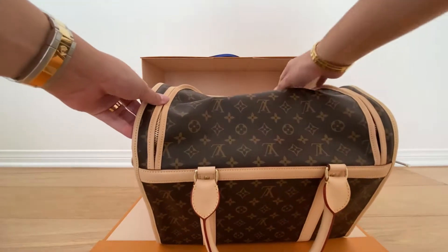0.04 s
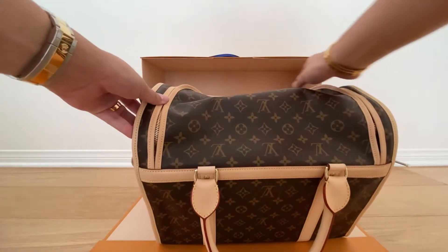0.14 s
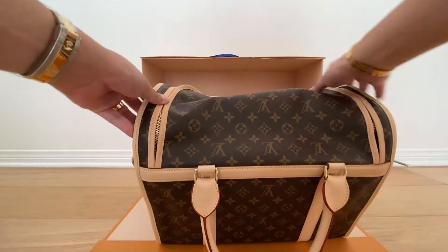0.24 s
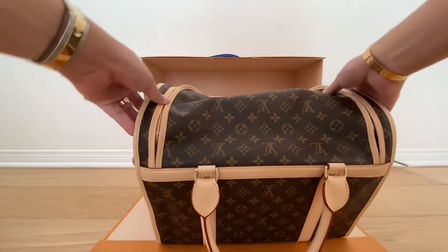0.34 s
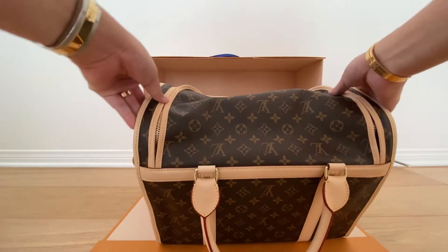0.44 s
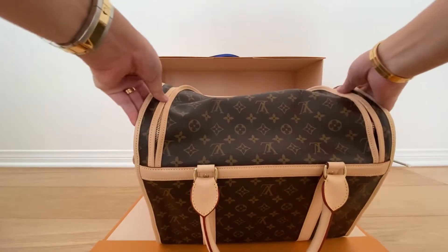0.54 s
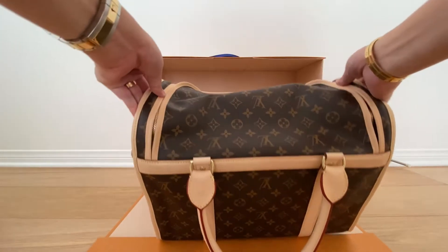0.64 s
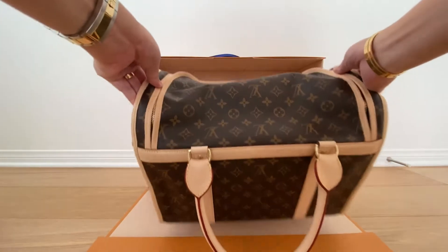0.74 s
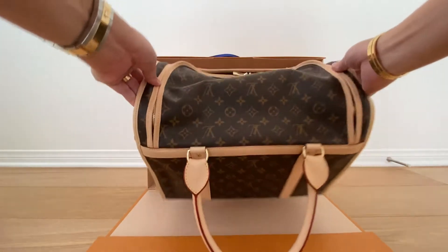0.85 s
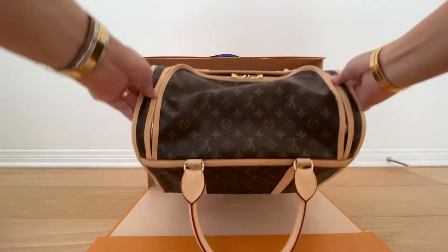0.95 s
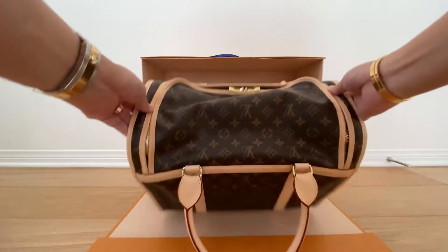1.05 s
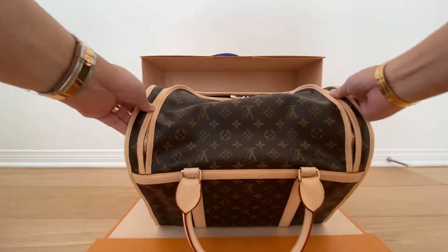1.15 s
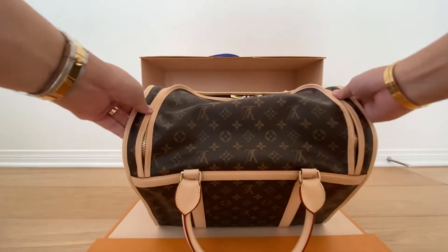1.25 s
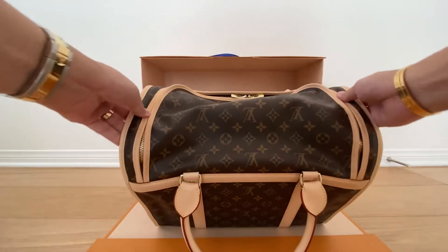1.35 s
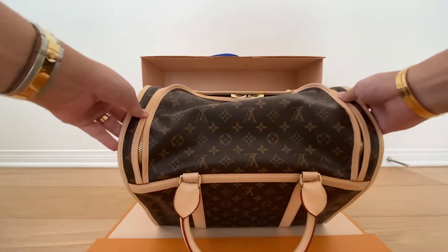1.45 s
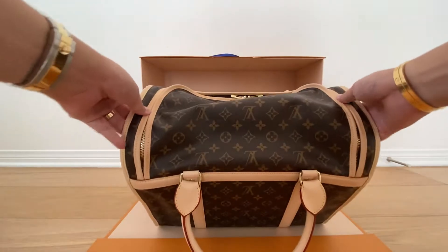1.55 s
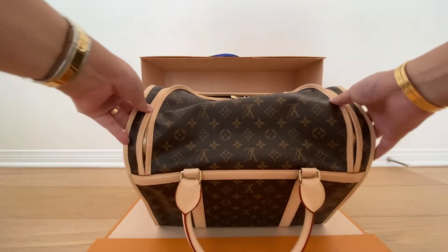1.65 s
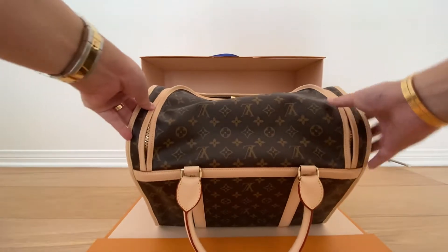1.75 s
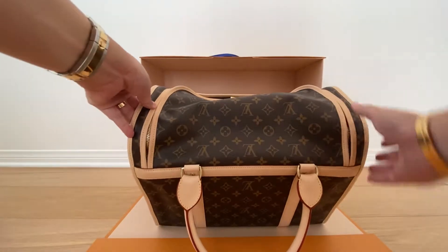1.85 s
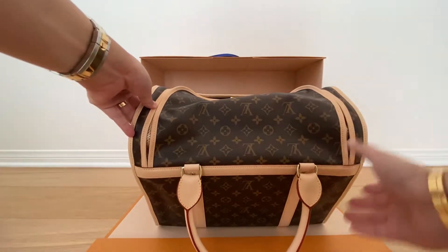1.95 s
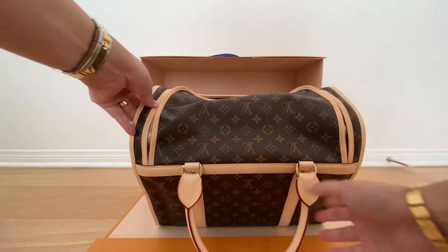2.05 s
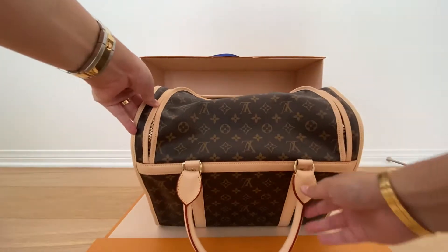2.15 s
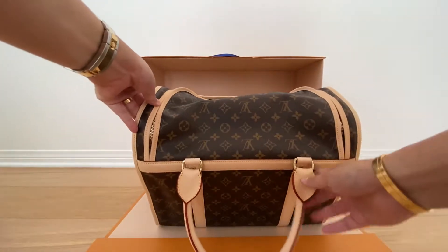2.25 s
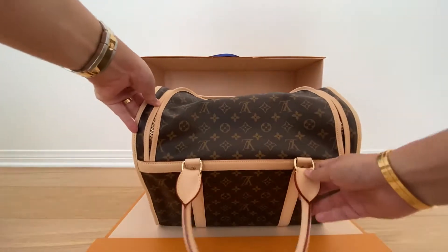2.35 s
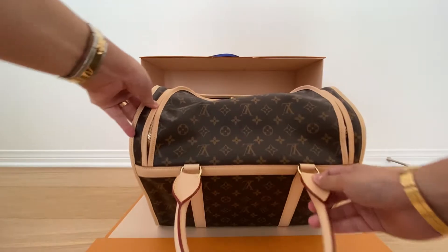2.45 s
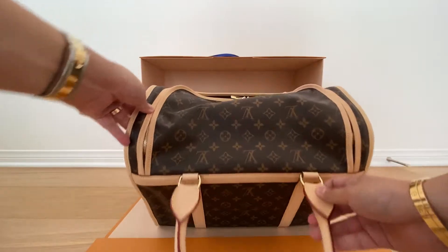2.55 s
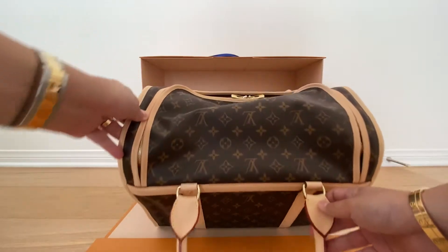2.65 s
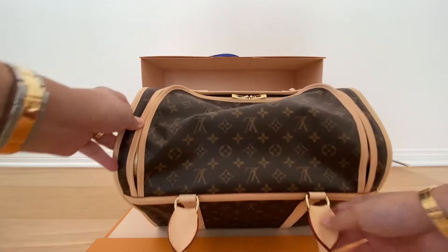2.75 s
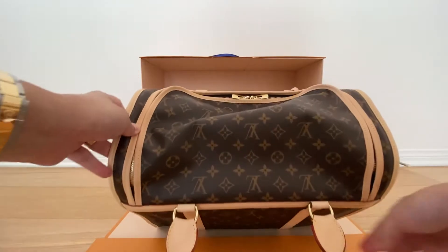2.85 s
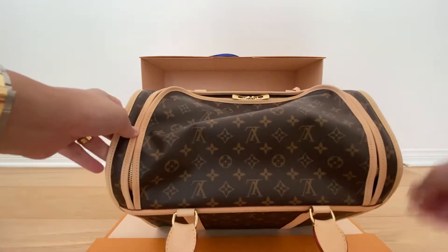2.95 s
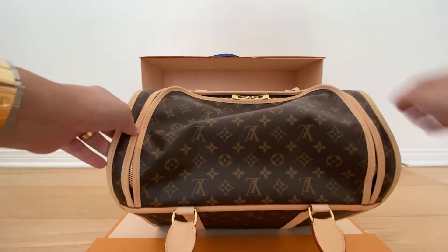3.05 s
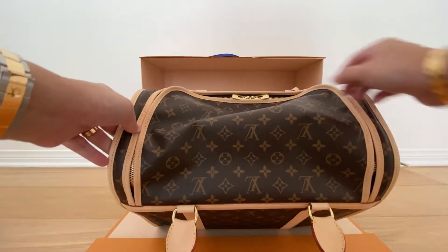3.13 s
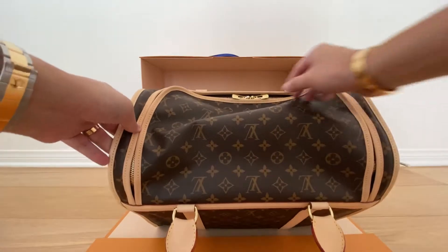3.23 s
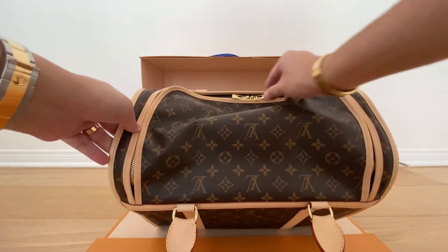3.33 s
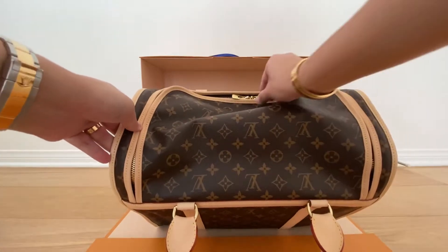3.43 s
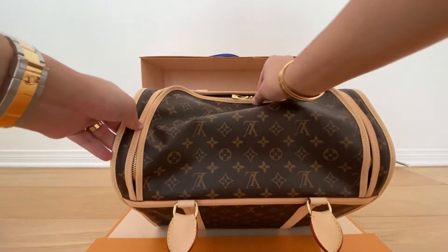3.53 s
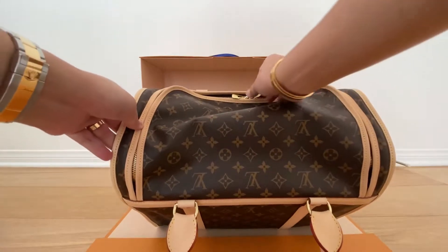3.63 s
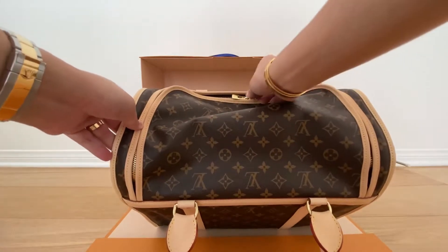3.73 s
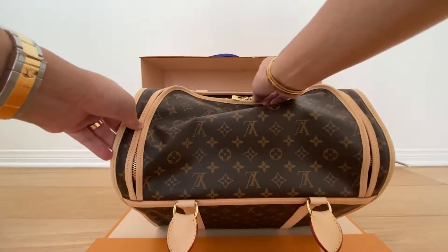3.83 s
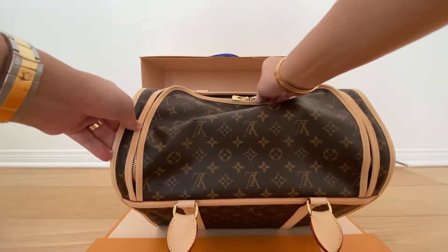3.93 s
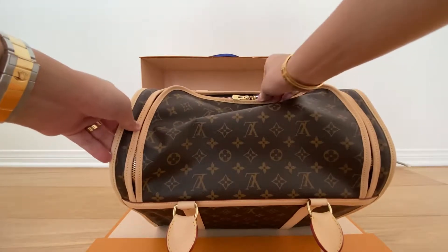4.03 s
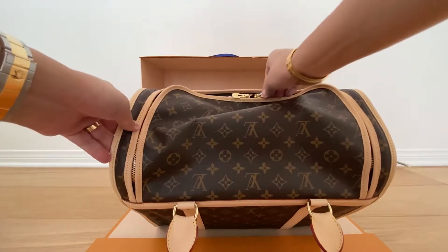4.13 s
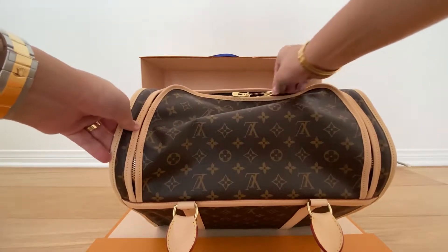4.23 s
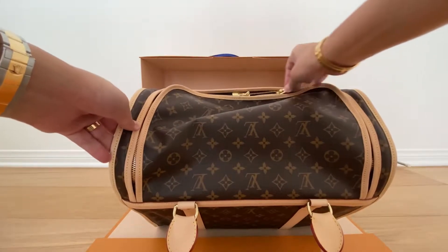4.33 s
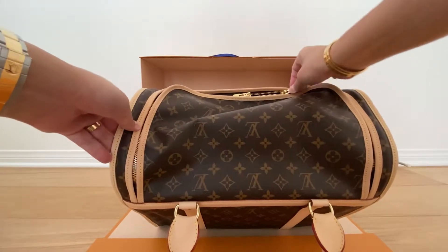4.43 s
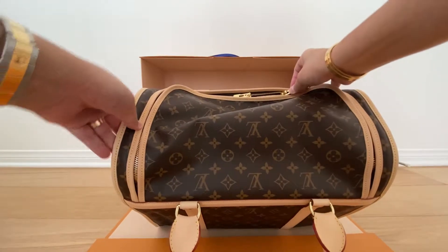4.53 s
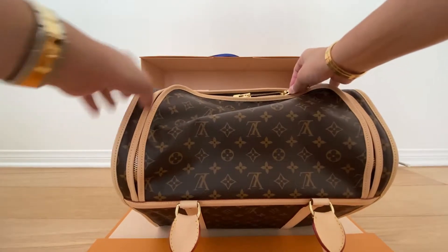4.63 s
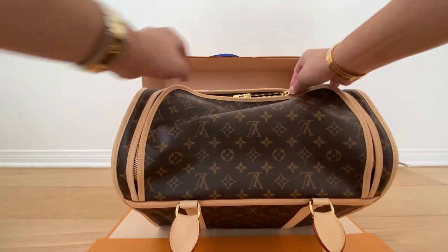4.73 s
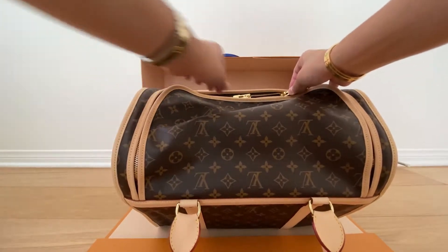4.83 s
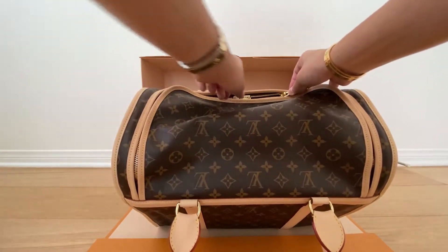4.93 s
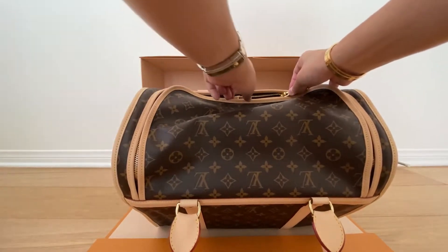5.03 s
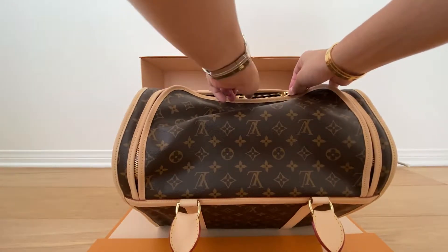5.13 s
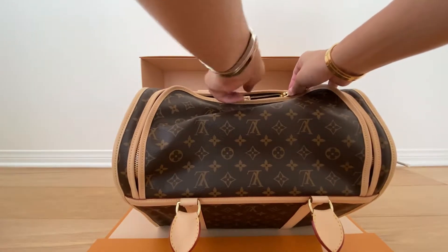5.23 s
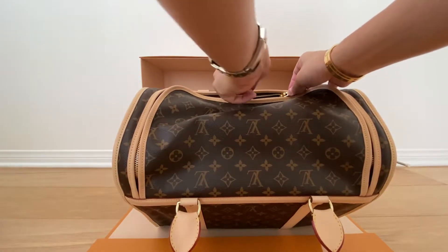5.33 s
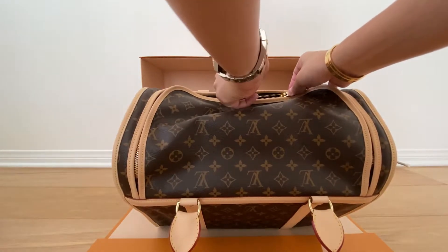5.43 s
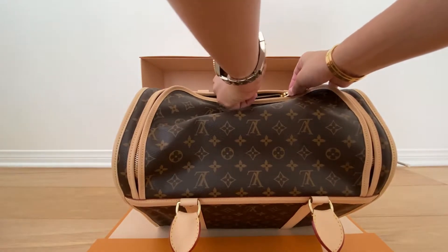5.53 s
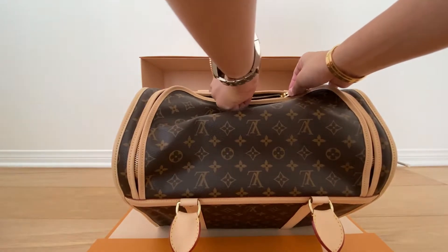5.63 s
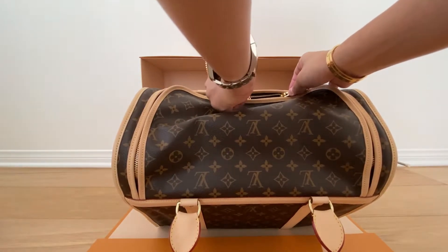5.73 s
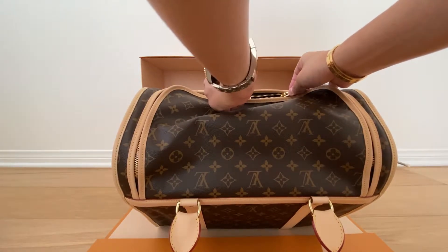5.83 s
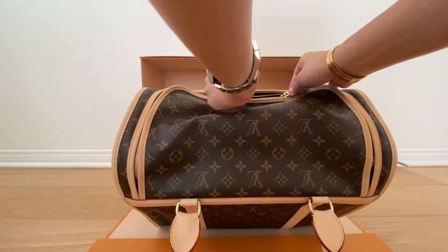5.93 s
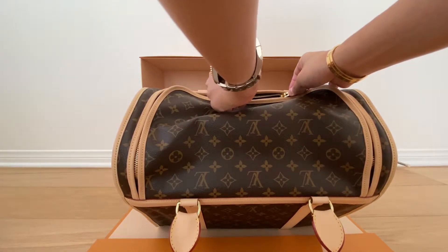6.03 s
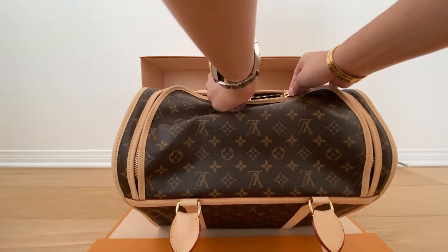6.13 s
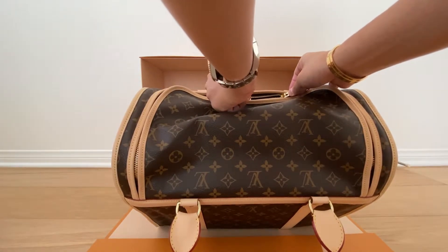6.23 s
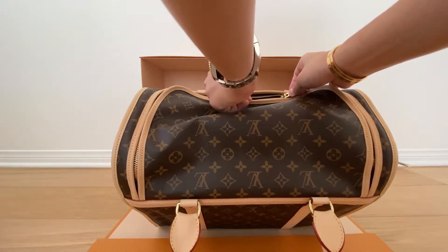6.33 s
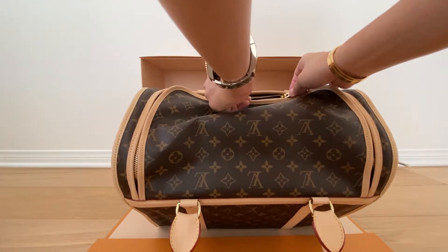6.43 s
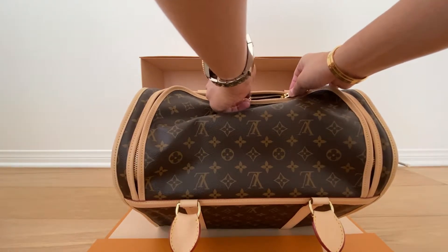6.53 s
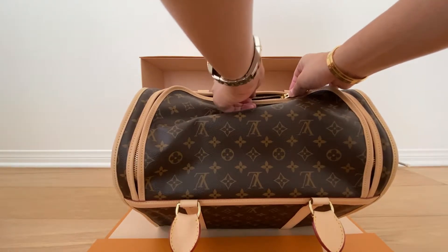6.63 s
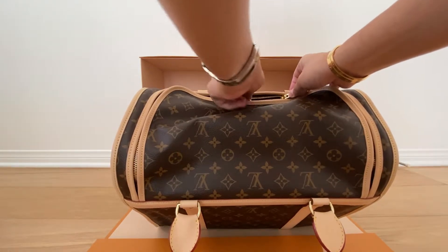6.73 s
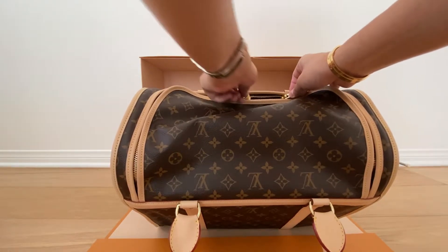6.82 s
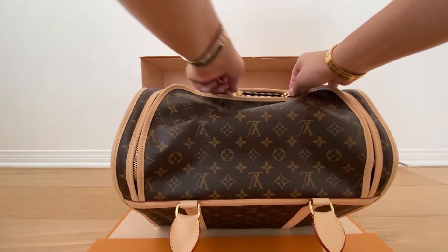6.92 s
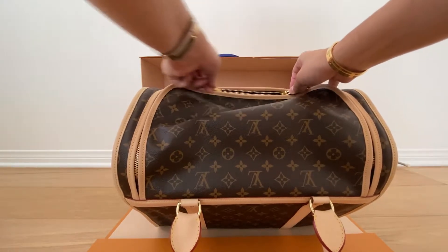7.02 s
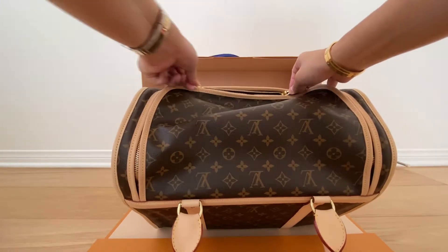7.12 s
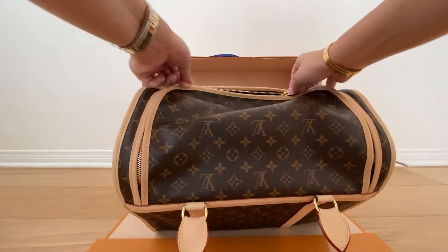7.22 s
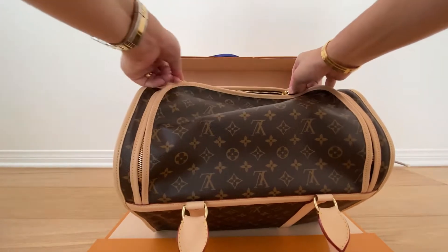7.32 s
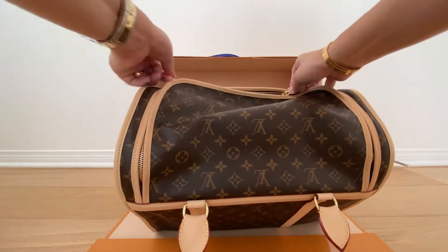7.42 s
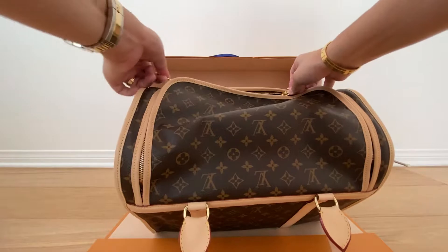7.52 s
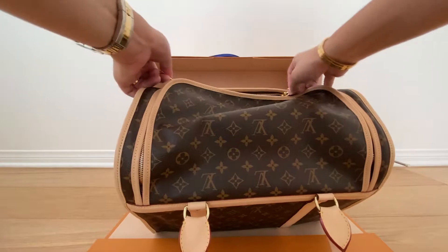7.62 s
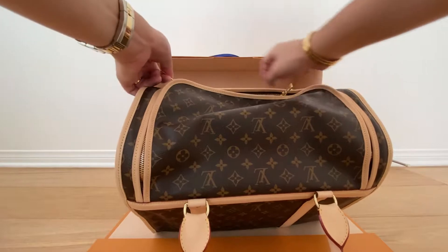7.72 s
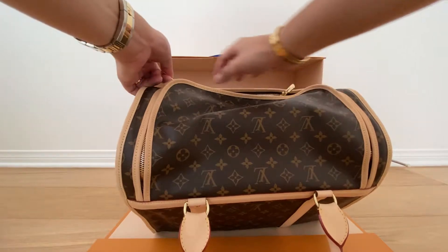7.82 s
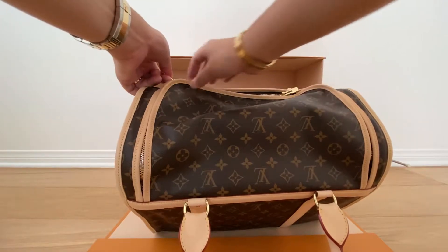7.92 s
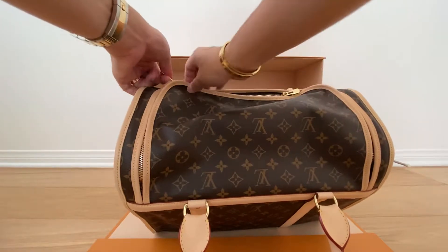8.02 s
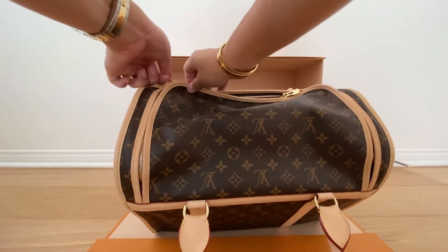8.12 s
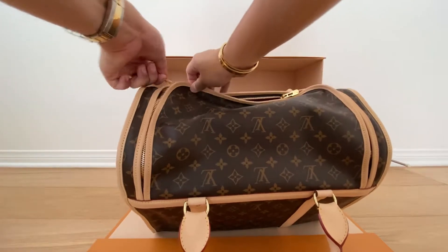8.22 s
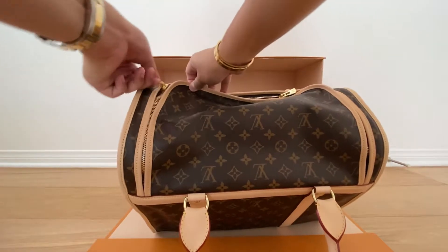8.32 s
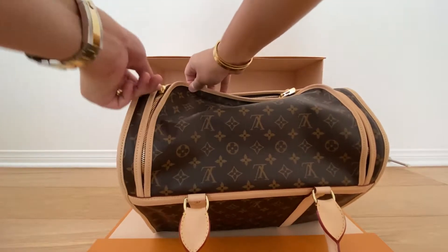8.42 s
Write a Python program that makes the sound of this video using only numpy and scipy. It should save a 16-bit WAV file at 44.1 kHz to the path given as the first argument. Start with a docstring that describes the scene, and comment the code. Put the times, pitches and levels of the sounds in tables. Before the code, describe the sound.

Close in a bare, lively room with a faint steady hum, hands rustle and bump a stiff canvas bag. Studs knock hard on a cardboard box as it is set down, and a distant bird whistles briefly. Metal tabs tick, then a zipper gives one short rasping pull, a pause of clicks and soft bumps, and three more quick pulls near the end.

```python
"""Hands rustle on a stiff canvas bag and metal pull tabs tick, in a bare, echoing room with a quiet hum.
The bag is turned and set down on a cardboard box, its studs knocking; a bird whistles far outside.
Then the zipper is drawn open in short pulls. Its teeth are pulses that rasp, ring the slider and drum the bag.
Knocks and ticks are micro-impacts through resonances, rustle is grainy noise, the bird is gliding sines."""
import sys
import numpy as np
from scipy import signal
from scipy.fft import rfft, irfft, next_fast_len
from scipy.io import wavfile
from scipy.ndimage import uniform_filter1d, map_coordinates

SR = 44100
rng = np.random.default_rng(int(sys.argv[2]) if len(sys.argv) > 2 else 0)


def to_wav(s):
    """Save 16-bit WAV."""
    ch = np.atleast_2d(s).T  # columns
    pcm = np.round(np.clip(ch, -1, 1) * 32767)  # PCM
    wavfile.write(sys.argv[1], SR, pcm.astype(np.int16))


N = 373527
time = np.arange(N) / SR


def amp(db):
    """Gain of a dB value."""
    return 10 ** (np.asarray(db) / 20)


def unit(x):
    """x at rms 1."""
    return x / np.sqrt(np.mean(x ** 2) + 1e-20)


def along(points, hz):
    """Reads a curve of (Hz, value) points on a log frequency axis."""
    f, v = np.transpose(points)
    return np.interp(np.log(hz + 1), np.log(f + 1), v)


def wobble(rate):
    """A smooth random curve, rate knots a second."""
    knots = rng.standard_normal(int(N * rate / SR) + 4)
    return map_coordinates(knots, [time * rate])


def filtered(x, response):
    """x times a complex response of frequency."""
    m = next_fast_len(len(x) + 8192)
    return irfft(rfft(x, m) * response(np.fft.rfftfreq(m, 1 / SR)), m)[:len(x)]


def modes(table):
    """Causal response of (Hz, width Hz, dB) resonances, summed with alternating sign."""
    def response(f):
        total = 0
        for k, (centre, width, db) in enumerate(table):
            damping = 1j * f * width
            total = total + (-1) ** k * amp(db) * damping / (centre * centre - f * f + damping)
        return total
    return response


def noise(spectrum):
    """Coloured noise of rms 1."""
    return unit(filtered(rng.standard_normal(N), lambda hz: amp(along(spectrum, hz))))


def add(track, s, sound):
    """Mixes a sound into a track at s seconds."""
    part = track[round(s * SR):][:len(sound)]
    part += sound[:len(part)]


# Zipper pulls, one list of breakpoints per pull. Each row: time in seconds, teeth per second,
# rasp level in dB, drumming of the bag in dB relative to the rasp, pitch of the stretched panel in Hz.
ZIPPER_PULLS = [
    [(4.12, 55.4, -69.5, 2, 266), (4.216, 61.8, -57.5, 3.5, 240), (4.302, 99.5, -57.5, 7, 215),
     (4.416, 93, -60, 8.5, 234), (4.47, 89, -76, 4, 218), (4.6, 72.5, -70, 11, 277)],
    [(6.88, 59.7, -68, 15, 236), (6.926, 69.3, -59, 4.5, 226), (7.012, 86.5, -54, 8, 176),
     (7.084, 87.4, -51.5, 10.5, 190), (7.134, 94, -61, 16, 280), (7.176, 92, -55, 10, 268),
     (7.215, 53, -70, 6, 231)],
    [(7.23, 68, -66, 0, 231), (7.272, 72.4, -59.5, 11, 231), (7.366, 68, -56.5, 7.5, 253.7),
     (7.45, 67, -61, 11.5, 141), (7.58, 51, -71.5, 5, 144)],
    [(8.17, 59, -68.5, 9, 310), (8.22, 68.5, -53.5, 3.5, 255), (8.272, 86, -53, -0.5, 285),
     (8.362, 83, -62, 10.5, 278), (8.412, 82, -63, 4.5, 253), (8.47, 82, -56, 14.5, 250)],
]
# Balance of each pull. Each row: slider ring at full effort and rocking of the bag halfway,
# both in dB relative to the rasp.
PULL_MIXES = [(-1.5, 3), (-5, -20), (-4.5, 7.5), (-1.5, 2.5)]
# Colour of the tooth rasp. Each row: frequency in Hz, density in dB per Hz.
TOOTH_RASP = [(530, 1), (900, 3.5), (1100, 1), (2390, -1.5), (2730, -6), (2960, -1), (4570, -7),
              (7140, -9.5), (14200, -12.5), (16000, -21)]
# Ring of the slider. Each row: frequency in Hz, width in Hz, relative level in dB.
SLIDER_MODES = [(5400, 900, 3), (7000, 1800, 3.5), (7560, 320, -3), (10800, 1600, -9)]
# Hollow bag. Each row: frequency in Hz, width in Hz, relative level in dB.
BAG_MODES = [(198.6, 164, -2.5), (616, 49, -0.5), (740, 47, 3), (1040, 2400, -25)]
RING_GROWS, RING_LAG_S = 1.2, 0.027  # the ring swings wider than the rasp and follows it
ROCK_GROWS_DB = 4.5  # from start to end of a pull


def zipper():
    """The slider parts tooth after tooth: each one rasps briefly, rings the slider and jolts the hollow bag."""
    rasp, drum, ring = np.zeros(N), np.zeros(N), np.zeros((len(SLIDER_MODES), N))
    for pull, (top_db, rock_db) in zip(ZIPPER_PULLS, PULL_MIXES):
        s, *cols = np.transpose(pull)
        rate, rasp_db, drum_db, pitch_hz = [np.interp(time, s, c) for c in cols]
        effort_db = np.interp(time - RING_LAG_S, time, rasp_db) - rasp_db.max()
        ring_db = top_db + RING_GROWS * effort_db
        boom_db = rock_db + ROCK_GROWS_DB * np.interp(time, s[[0, -1]], [-.5, .5])
        on = np.interp(time, [s[0], s[0] + 0.0075, s[-1] - .02, s[-1] + 0.016], [0, 1, 1, 0])

        def level(x, db):
            """Sets x to db relative to the rasp, inside this pull."""
            return on * amp(rasp_db + db) * x / np.sqrt(np.mean(x[on > .5] ** 2))

        pace = rate * (on > 0) * (1 + .05 * wobble(40))
        teeth = np.diff(np.floor(np.cumsum(pace) / SR), prepend=0)  # one pulse per tooth

        def burst():
            """A short decay per tooth, each at a new random strength."""
            strikes = teeth * amp(3.2 * wobble(120))
            decays = signal.lfilter([1], [1, -np.exp(-1 / (SR * .0035))], strikes)
            return uniform_filter1d(decays, size=60)

        jolts = teeth * amp(0.59 * wobble(120)) + 0.04 * rng.standard_normal(N)
        # the slider also rubs between teeth and moves in surges
        rasp += level((burst() + .25) * amp(2.5 * wobble(18)), 0)
        ring += [level(abs(burst()) ** 0.57, ring_db) for mode in SLIDER_MODES]
        hollow = filtered(jolts, modes(BAG_MODES))
        drum += level(panel(hollow, pitch_hz, lift_db=17.0, width=0.26), drum_db)
        rough_jolts = jolts + 0.023 * rng.standard_normal(N)
        rocking = filtered(rough_jolts, lambda f: modes([(85, 130, 0)])(f) ** 2)  # the whole bag rocks
        drum += level(rocking, boom_db)
    chime = [amp(db - 7) * unit(filtered(rng.standard_normal(N), modes([(hz, width, 0)])))
             for hz, width, db in SLIDER_MODES]
    return rasp * noise(TOOTH_RASP) + np.sum(ring * chime, axis=0) + drum


def panel(x, pitch_hz, lift_db, width):
    """A resonance that moves as the pull stretches the canvas."""
    hz, t, z = signal.stft(x, SR, nperseg=2048, noverlap=1792)
    centre = np.interp(t, time, pitch_hz)
    distance = np.log((hz[:, None] + 1) / centre) / width
    lifted = z * amp(lift_db * np.exp(-distance ** 2))
    return signal.istft(lifted, SR, nperseg=2048, noverlap=1792)[1][:N]


# Studs and rings knocking on box and bag. Each row: start in seconds, level in dB, brightness in dB
# per octave, length in seconds (time to fall 20 dB), loudest ring in Hz, its lift in dB,
# room in dB relative to the knock, thump in dB, thump pitch in Hz.
STUD_KNOCKS = [(0.9715, -26, -25.5, 0.0093, 1300, 9.5, -4, -45, 106.4),
               (1.1204, -24, -12.5, 0.019, 1350, 0, -6, -35, 65.7),
               (2.623, -51.5, -20, 0.0067, 1692, 5, -0.5, -65, 117),
               (2.644, -40.5, -16.5, 0.017, 3890, 11, -5.5, -64, 120.5),
               (2.652, -16.5, -13, 0.013, 1446, 9, -6, -47, 104.6),
               (3.716, -45, -16, 0.0056, 924, 8, -14, -63, 205),
               (5.626, -44.5, -16.5, 0.045, 686, 12, -3, -66, 196.2)]
# Cardboard box. Each row: frequency in Hz, width in Hz, relative level in dB.
BOX_MODES = [(620, 630, -5.5), (1200, 1000, -3.5), (1910, 670, 2), (2570, 310, 7.5), (2830, 1110, 5.5),
             (4820, 5200, 2), (7800, 3800, -24), (12400, 6200, -0.5)]
KNOCK_WIDTH = 0.42  # of the ring, as a share of its pitch
CRACK_DB = 6.5  # crack relative to the body, at -12.5 dB per octave
CRACK_GROWS = 3.5  # dB more for each dB per octave of brightness


def knocks():
    """Studs chatter on the box, and the weight of the bag follows as a thump."""
    out = np.zeros(N)
    for s, db, tilt_db, *ring, thump_db, thump_hz in STUD_KNOCKS:
        crack_db = CRACK_DB + CRACK_GROWS * (tilt_db + 12.5)
        near, even = contact(BOX_MODES, db, tilt_db, *ring, KNOCK_WIDTH, crack_db, rise=0.0036)
        thump = bump(thump_db, thump_hz, 4) + bump(thump_db + 7, 149, 1.86) + bump(thump_db + 9, 254.5, 2.67)
        add(out, s, near)
        add(out, s, room(even))
        add(out, s + 0.0066, thump)
        add(out, s + 0.0063, amp(-2.0) * room(thump))
    return out


# Metal tabs and bangles touching. Each row: start in seconds, level in dB, brightness in dB per octave,
# loudest ring in Hz, its lift in dB, tab ring in dB relative to the tick level.
METAL_TICKS = [(0.089, -54, -10, 3280, 11, -25), (0.149, -54.5, -4, 1840, 9, -26),
               (0.8647, -46.5, -5, 2400, 8, -28), (1.3283, -53, 0, 1710, -1, -22),
               (1.375, -56, 1, 1940, 3, -22), (1.9577, -59.5, -2, 1650, -1, -23),
               (2.778, -46, -9, 2520, 22, -35), (3.2694, -56.5, -10, 2140, 3, -25),
               (3.6057, -51.5, 1.5, 1560, 7, -32.5), (3.9917, -48, -1.5, 2500, -3, -27),
               (4.585, -55, -12, 1581, -8.5, -30), (4.995, -55, -5.5, 2500, 8, -8),
               (5.0993, -45.5, 0.5, 6100, 1, -20), (5.2826, -58, -3, 4000, 0, -24),
               (5.3146, -53, -1.5, 2420, -6, -30), (5.3264, -62, -4, 9910, 14, -3.5),
               (5.613, -42.5, -5, 2250, 0, -24), (5.6232, -29.5, 3.5, 7070, 14.5, -15),
               (5.938, -55.5, -5.5, 4534, 3, -30), (5.968, -53, 2.5, 6220, -3, -19),
               (6.2854, -46, -8, 2000, 7, -18), (6.5295, -46, -9, 2650, 7, -21),
               (6.546, -46, -1.5, 4220, 4, -32.5), (6.68, -48.5, -4, 2150, 3, -29),
               (6.807, -50, 0, 5500, 4, -28), (6.868, -39, 0, 3170, 1, -24), (6.887, -47, 8, 2030, 3, -22),
               (7.243, -49.5, -12, 1740, 8, -19), (7.6897, -50, 0, 4470, 10, -33),
               (7.7127, -49.5, -1, 2460, 6, -19), (7.9793, -52, 1, 4250, 7, -29),
               (8.456, -39.5, 4, 5300, -4, -27)]
# Small metal parts. Each row: frequency in Hz, width in Hz, relative level in dB.
METAL_MODES = [(900, 890, 11), (2645, 1000, 11), (4500, 2600, 6), (6100, 800, 5), (8760, 3600, -15),
               (10400, 2400, 5), (13200, 2000, -8)]
# The pull tab rings on. Each row: frequency in Hz, average level in dB, time to fall 60 dB in seconds.
TAB_RING = [(4580, -12, 0.07), (6080, -3, 0.1), (9050, -8, .08), (9950, -7, 0.07)]
TICK_S, TICK_ROOM_DB = .005, -2.5  # time to fall 20 dB; room relative to the tick
RING_WIDTH = .22  # of a metal ring, as a share of its pitch
FAINT_COUNT = 14  # faint ticks at random moments
FAINT_DB, FAINT_SPREAD_DB, FAINT_HZ = -65, 2, 2000  # levels reach two spreads either way


def ticks():
    """Small metal parts touch and set the pull tab ringing, strongly or barely."""
    out, t = np.zeros(N), time[:SR // 5]
    faint = [(when * N / SR, FAINT_DB + FAINT_SPREAD_DB * (4 * size - 2), 0,
              FAINT_HZ * 2 ** (2 * pitch - .5), 3, -23)
             for when, size, pitch in rng.uniform(size=(FAINT_COUNT, 3))]
    for s, db, tilt_db, ring_hz, lift_db, tab_db in METAL_TICKS + faint:
        near, even = contact(METAL_MODES, db, tilt_db, TICK_S, ring_hz, lift_db, TICK_ROOM_DB,
                             width=RING_WIDTH, crack_db=-5.5, rise=0.0022)
        tab = np.zeros(len(t))
        for hz, level, t60 in TAB_RING:
            decay = amp(level + rng.normal(0, 4.7) - 60 * t / t60)
            drift = np.cumsum(rng.normal(0, 0.1, len(t)))  # loose, so unsteady
            tab += decay * np.sin(2 * np.pi * hz * t + drift)
        add(out, s, near)
        add(out, s, room(even))
        add(out, s + 0.0039, amp(db + tab_db) * tab)
    return out


def contact(body, db, tilt_db, length, ring_hz, lift_db, room_db, width, crack_db, rise):
    """A short chatter of micro-impacts rings a body; the room, hearing it from all sides, gets its even colour."""
    t = time[:SR // 20]
    f = np.fft.rfftfreq(len(t), 1 / SR)
    chatter = rng.standard_normal(len(t)) * amp(-20 * t / length) * (1 - np.exp(-t / rise))
    lift = 1 + amp(lift_db) * modes([(ring_hz, width * ring_hz, 0)])(f) ** 2
    hardness = (1 + 1j * f / 1500) ** (tilt_db / 6)  # hard contacts are brighter
    colour = modes(body)(f) * lift * hardness
    near, even = irfft(rfft(chatter) * colour, len(t)), irfft(colour, len(t))
    # the crack is heard only close by
    sharp = rfft(chatter * amp(-20 * t / 0.0037))
    crack = irfft(sharp * hardness * (1j * f / (3000 + 1j * f)), len(t))
    near = amp(db) * (near / np.abs(near).max() + amp(crack_db) * crack / np.abs(crack).max())
    return near, amp(room_db) * even * np.linalg.norm(near) / np.linalg.norm(even)


# Fingers sliding over the canvas. Each row: middle in seconds, length in seconds, level in dB,
# bright share from 0 to 1, rumble of the bag in dB.
CANVAS_SWISHES = [(0.03, 0.27, -79.5, 0.35, -63), (0.39, 0.19, -70, 0.33, -64),
                  (0.539, 0.16, -62.5, 0.28, -61), (0.863, 0.17, -64.5, 0, -73.5),
                  (1.33, 0.12, -88, 0.42, -69), (1.557, 0.15, -72.5, 0.5, -72),
                  (1.676, 0.17, -67, 0.5, -85), (2.308, 0.093, -68.5, 0.02, -76),
                  (3.265, 0.037, -74, 0.3, -57), (3.362, 0.15, -71.5, 0.1, -63),
                  (4.011, 0.28, -83, 0.24, -70), (5.045, 0.106, -77.5, 0.41, -73),
                  (6.317, 0.091, -70, 0.2, -78), (6.57, 0.12, -66, 0.27, -68.5),
                  (7.63, 0.33, -77, 0.25, -67), (8.049, 0.15, -67, 0.6, -61)]
# Soft bumps of the hands on the bag. Each row: start in seconds, level in dB, pitch in Hz.
HAND_BUMPS = [(0.085, -50, 272), (0.147, -52, 275), (0.388, -47, 81.3), (0.458, -51, 200),
              (3.251, -48, 252), (3.321, -44, 195.5), (3.37, -53, 230), (3.613, -55, 230),
              (4.579, -60, 251.1), (4.665, -71.5, 356), (4.921, -60, 198), (5.62, -42.5, 253),
              (5.939, -58, 253.7), (5.967, -48.5, 280), (6.279, -50.5, 229.4), (6.481, -46.5, 252.5),
              (6.528, -54, 383), (7.629, -67, 144), (7.71, -59, 90.75)]
# Level curve of the steady rustle. Each row: time in seconds, level in dB.
RUSTLE_LEVEL = [(0, -75), (.3, -77.5), (.6, -77.5), (.95, -68.5), (1.3, -75.5), (1.95, -77.5), (3.5, -78),
                (6.25, -83), (6.85, -75), (7.8, -82), (8.2, -73)]
# Colour of the canvas rustle. Each row: frequency in Hz, density in dB per Hz.
CANVAS_COLOUR = [(410, -53.5), (700, 13), (841, -27), (898, -2.5), (2220, -4), (2800, -6), (7590, -9.5),
                 (13900, -20.5), (16000, -43)]
# Colour of the bag's rumble. Each row: frequency in Hz, density in dB per Hz.
HEAVE_COLOUR = [(18, -61), (30, -1), (80, -1), (336, -1.5), (375, -37), (400, -4), (520, -16), (880, -120)]
RUMBLE_DB = -83.5  # of the bag held still


def hands():
    """Fingers rub the canvas in grains, slide over it, heave the bag and bump it."""
    grains = unit(amp(2.27 * wobble(60) + 0.53 * wobble(270)))
    rub = grains * noise(CANVAS_COLOUR)
    fine = unit(np.diff(rub, 2, prepend=[0, 0]))  # a light touch only hisses
    heave = amp(5.6 * wobble(14)) * noise(HEAVE_COLOUR)
    rustle_db = np.interp(time, *np.transpose(RUSTLE_LEVEL)) + 0.5 * wobble(4)
    out = amp(rustle_db) * rub + amp(RUMBLE_DB) * heave
    for middle, length, db, bright, rumble_db in CANVAS_SWISHES:
        slide = np.exp(-8 * ((time - middle) / (0.77 * length)) ** 2)
        push = np.exp(-8 * ((time - middle) / (1.34 * length)) ** 2)
        out += amp(db) * slide * ((1 - bright) * rub + bright * fine)
        out += amp(rumble_db) * push * heave
    for s, db, hz in HAND_BUMPS:
        add(out, s, bump(db, hz, 4.4))
    return out


def bump(db, hz, cycles):
    """A soft push: a few cycles of low, rough ringing."""
    turn = hz * time[:SR // 5]
    sound = np.sin(2 * np.pi * turn) + .5 * np.sin(2 * np.pi * 1.374 * turn + rng.uniform(0, 6.56))
    return amp(db) * sound * np.exp(-turn / cycles) * (1 - np.exp(-4 * turn))


# Whistles of a far bird. Each row: start in seconds, end in seconds, from pitch in Hz, to pitch in Hz, level in dB.
BIRD_WHISTLES = [(2.3, 2.342, 5700, 6070, -76), (2.33, 2.37, 6200, 5430, -71),
                 (2.377, 2.43, 5300, 4800, -74), (2.453, 2.473, 4900, 4850, -75),
                 (2.517, 2.549, 5050, 4700, -75), (2.572, 2.597, 4850, 5430, -71),
                 (2.608, 2.65, 5300, 4800, -70)]


def bird():
    """Short gliding whistles: sines that swell and fade as their pitch slides."""
    out = np.zeros(N)
    for start, end, from_hz, to_hz, db in BIRD_WHISTLES:
        n = round((end - start) * SR)
        turn = np.cumsum(np.linspace(from_hz, to_hz, n)) / SR
        add(out, start, amp(db) * np.hanning(n) * np.sin(2 * np.pi * turn))
    return out


# Colour of the room's air noise. Each row: frequency in Hz, density in dB per Hz.
AIR_COLOUR = [(15, -40), (25, -21), (80, 4.5), (301, -4.5), (384, -1.5), (516, 2), (575, -4), (714, -1.5),
              (1040, -18), (1330, -19.5), (1940, -22.5), (6920, -26), (12900, -31.5), (14400, -29),
              (16000, -59)]
# Fuzzy tones of a far fan. Each row: frequency in Hz, resonance width in Hz, level in dB.
FAN_TONES = [(367.84, 33, -70), (646, 43, -88), (736, 26, -91)]
AIR_DB = -65  # rms


def room_tone():
    """Steady air noise with a few fuzzy fan tones, each a noise through a narrow double resonance."""
    out = amp(AIR_DB) * noise(AIR_COLOUR)
    for hz, width, db in FAN_TONES:
        tone = filtered(rng.standard_normal(N), lambda f: modes([(hz, width, 0)])(f) ** 2)
        out += amp(db) * unit(tone)
    return out


# Decay of the room's main tail. Each row: frequency in Hz, time to fall 60 dB in seconds.
ROOM_DECAY = [(100, 0.54), (300, 0.27), (800, 0.38), (1400, 0.57), (2500, 0.43), (4500, 0.45), (7400, 0.51),
              (14000, 0.37)]


def room(x):
    """A bare room: each frequency of the tail dies at its own speed, after a gap; a weak late part lingers."""
    hz, t, z = signal.stft(rng.standard_normal(SR * 3 // 4), SR, nperseg=256)
    fall_db = -60 * t / along(ROOM_DECAY, hz)[:, None]
    fall = amp(fall_db) + amp(-24.5 + 0.31 * fall_db)
    tail = signal.istft(z * fall, SR, nperseg=256)[1]
    tail = tail * (1 - np.exp(-np.arange(len(tail)) / SR / 0.0017))
    delayed = np.pad(x, (480, 0))  # samples of gap to the first wall
    return signal.fftconvolve(delayed, tail / np.linalg.norm(tail))


def scene():
    """Near sounds, their room tails and the background."""
    slider, touch = zipper(), hands()
    wet = amp(-3) * room(slider)[:N] + amp(-4.5) * room(touch)[:N]
    return (amp(-1.0) * slider + touch + wet + knocks() + ticks() + bird() + room_tone())[None]


TOP_HZ = 15800  # band limit


def record(dry):
    """The microphone drops the deepest bass; nothing is kept above the band limit."""
    return filtered(dry[0], lambda hz: (hz < TOP_HZ) * (1j * hz / (45 + 1j * hz)) ** 2)[None]


dry = scene()
out = record(dry)
to_wav(out)
```